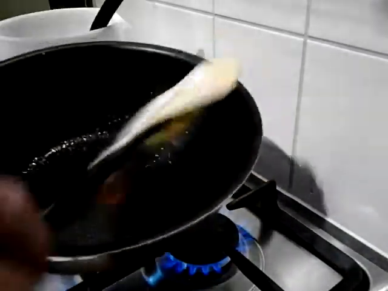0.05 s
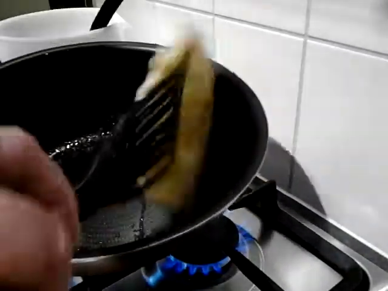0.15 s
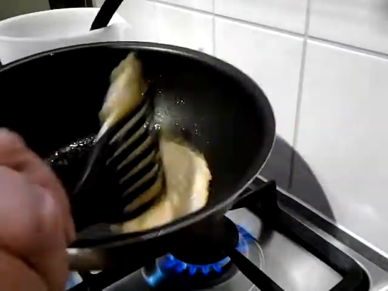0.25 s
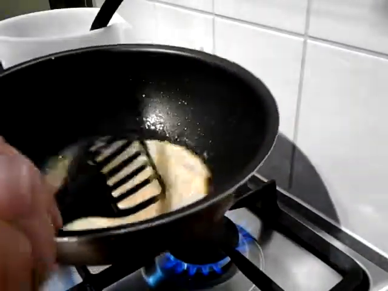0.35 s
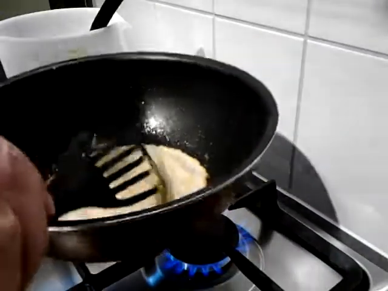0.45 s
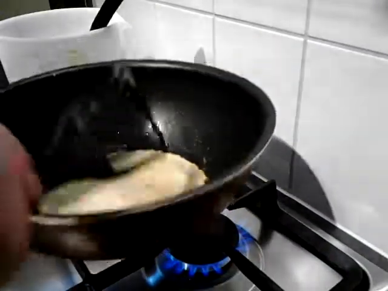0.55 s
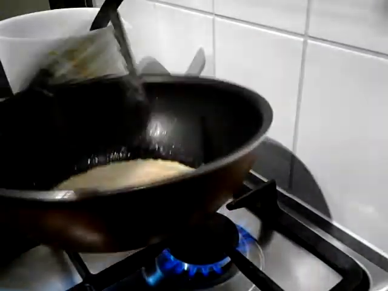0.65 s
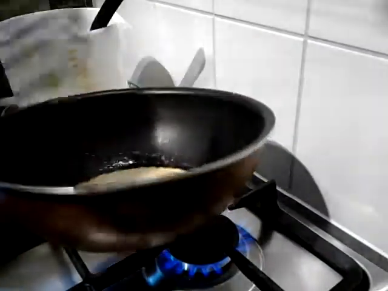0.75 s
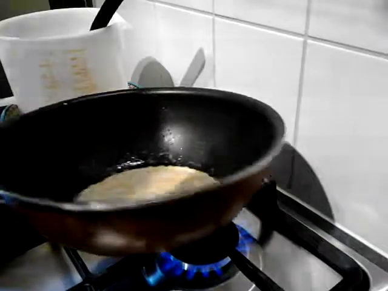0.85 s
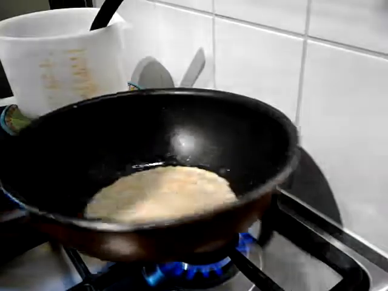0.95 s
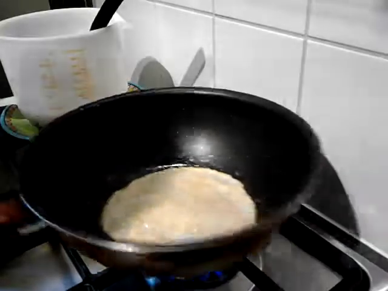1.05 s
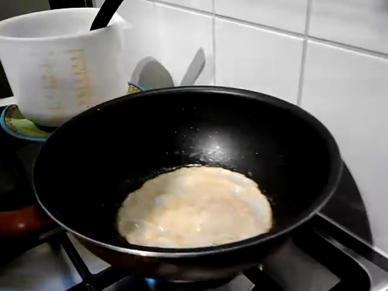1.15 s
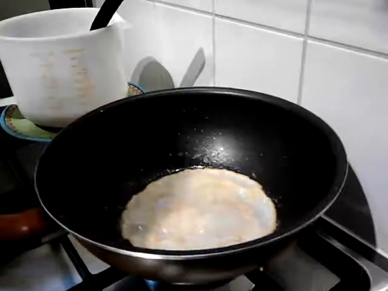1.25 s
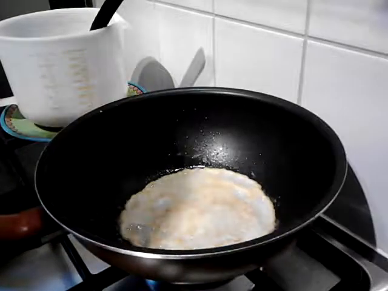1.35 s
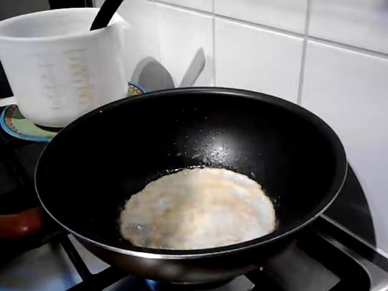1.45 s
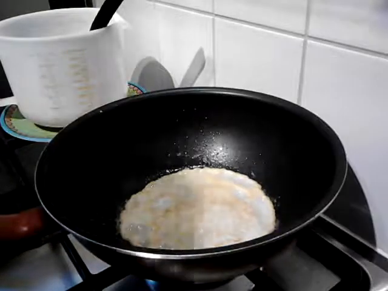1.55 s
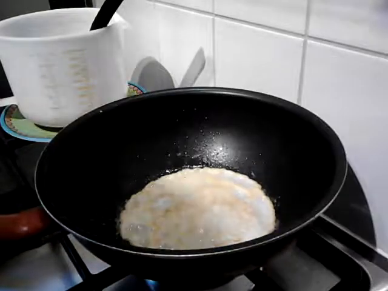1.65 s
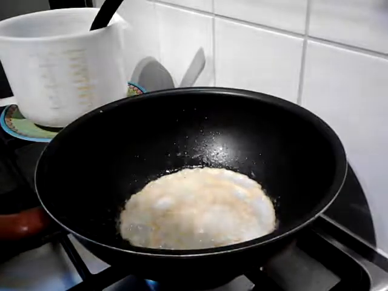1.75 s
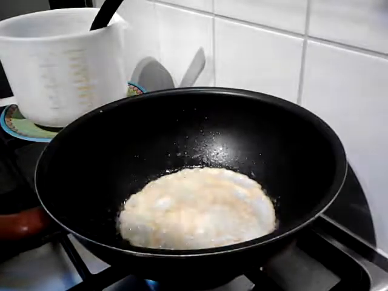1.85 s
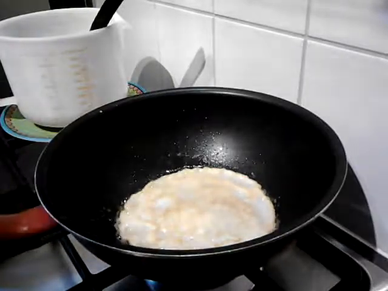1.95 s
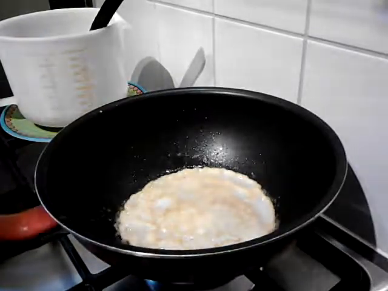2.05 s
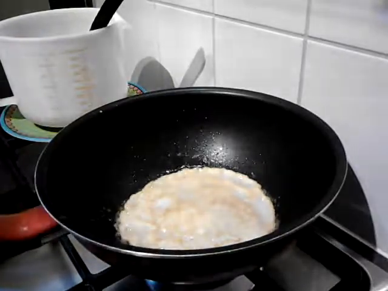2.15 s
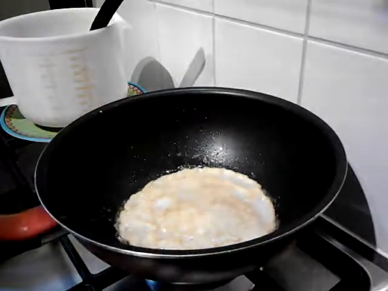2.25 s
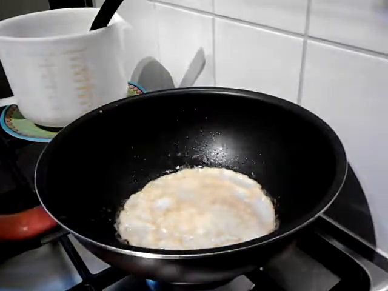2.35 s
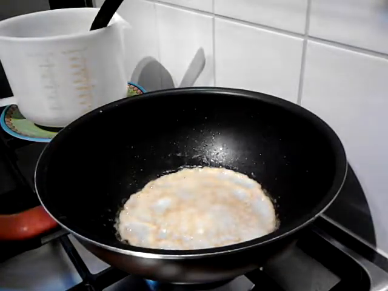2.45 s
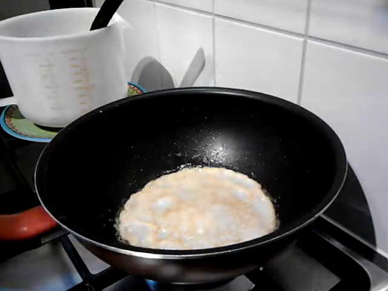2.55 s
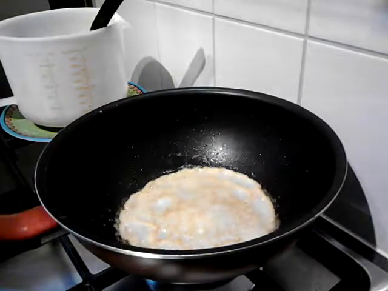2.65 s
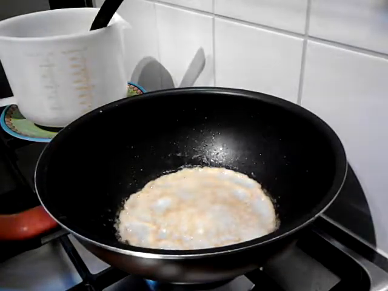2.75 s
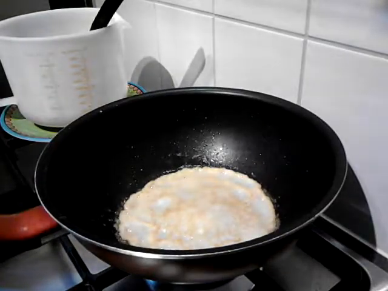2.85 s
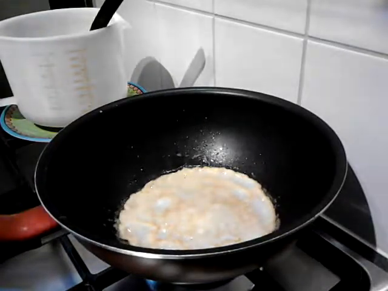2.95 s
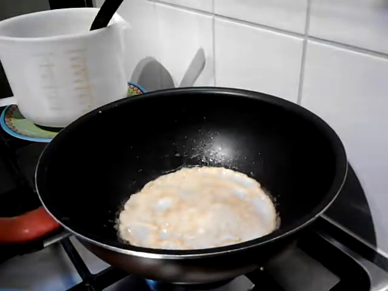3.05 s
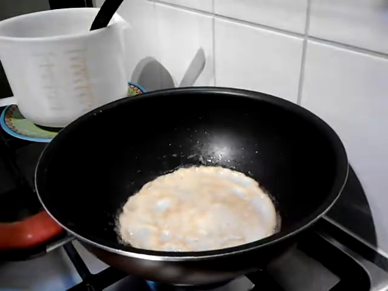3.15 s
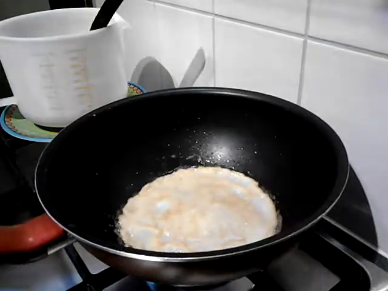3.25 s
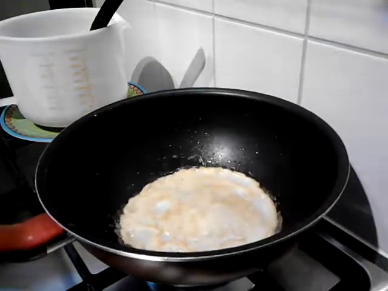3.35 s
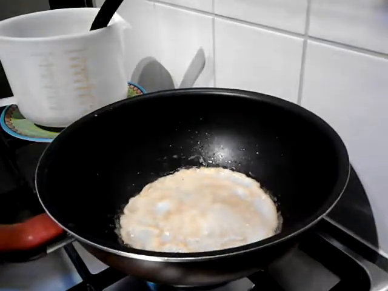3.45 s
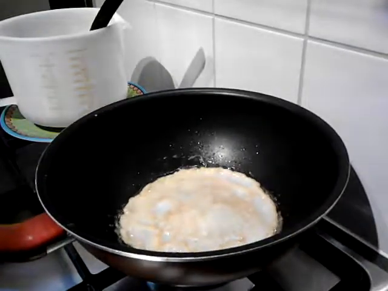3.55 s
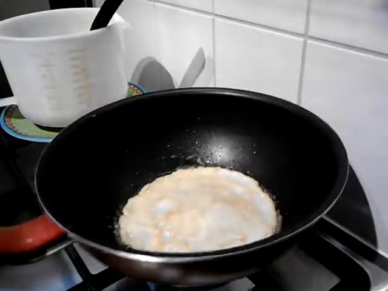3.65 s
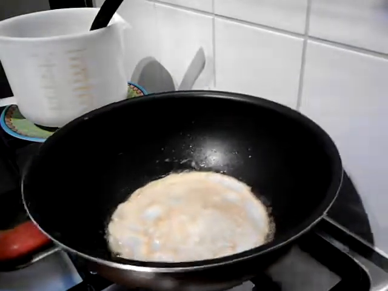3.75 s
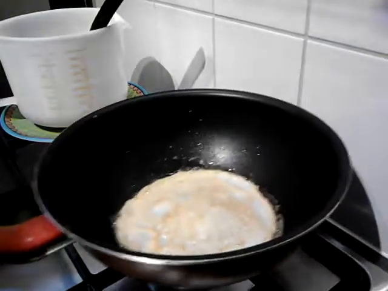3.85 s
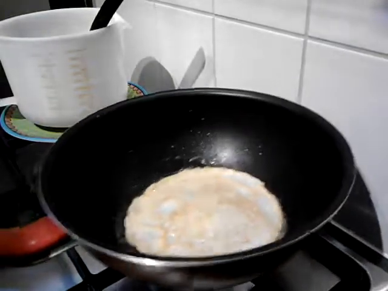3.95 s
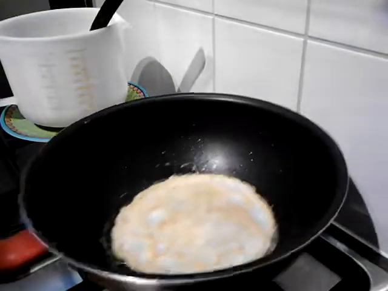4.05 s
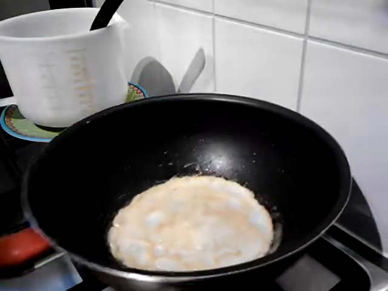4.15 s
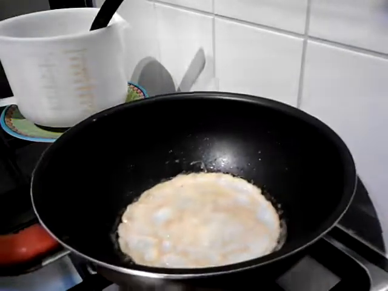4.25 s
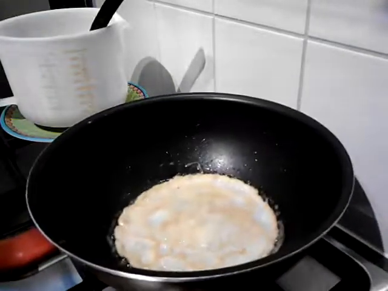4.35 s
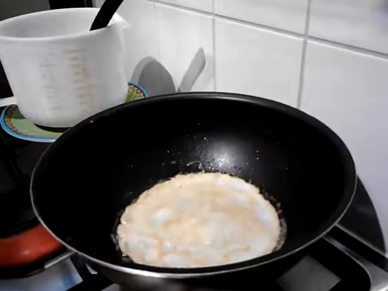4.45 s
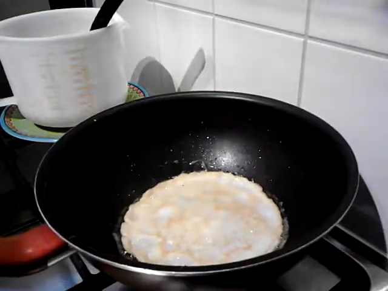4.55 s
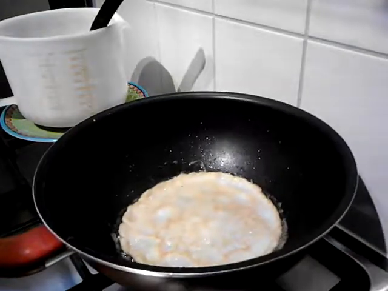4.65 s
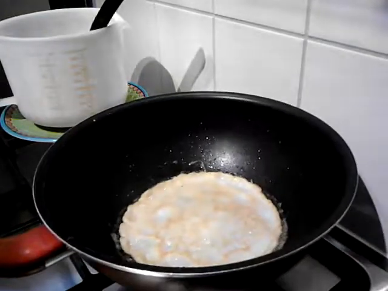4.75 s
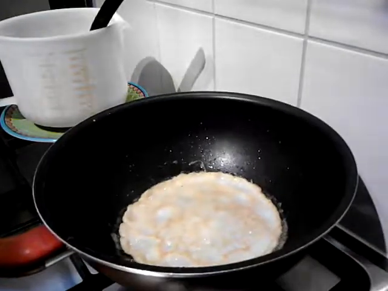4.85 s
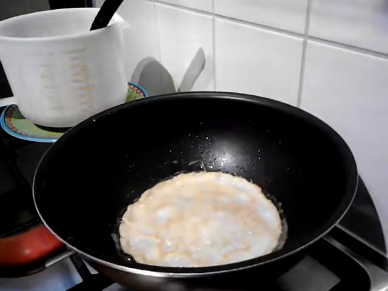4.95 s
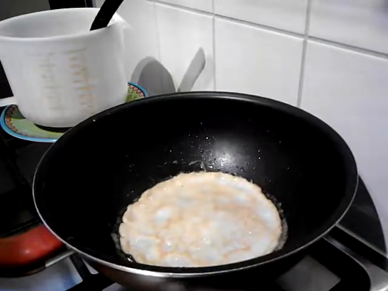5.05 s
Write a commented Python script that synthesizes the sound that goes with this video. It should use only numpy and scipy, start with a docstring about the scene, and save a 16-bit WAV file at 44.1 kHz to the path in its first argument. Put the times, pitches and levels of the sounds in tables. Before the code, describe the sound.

In a small tiled kitchen, a spatula taps a pan rim once, then the frying pan lands hard on the steel grate with a loud metallic clank and rocks in quick, fading clatters. A second later the spatula drops on the worktop and bounces briefly. Much softer pan knocks follow as it is nudged. A low, steady gas hiss and faint sizzle lie beneath. Close microphone, short hard room reflections.

```python
"""A frying pan lands on the steel grate of a lit gas hob in a small tiled kitchen, rocks, and is later nudged.
A spatula taps the pan's rim before the pan lands, and bounces on the worktop between the landing and the nudge.
Each contact is a noisy crack and clatter plus the object's ringing pitches, answered by the room.
Filtered noise makes the steady burner hiss, wavering sines its faint whistles, and tiny clicks the hot fat."""
import sys
import numpy as np
from scipy import signal
from scipy.fft import rfft, irfft, next_fast_len
from scipy.io import wavfile
from scipy.ndimage import map_coordinates

SR = 44100
rng = np.random.default_rng(int(sys.argv[2]) if len(sys.argv) > 2 else 0)


def file_out(sig):
    """Save sig as 16-bit WAV at sys.argv[1]."""
    # one column per channel
    cols = np.atleast_2d(sig).T
    # limit, then scale
    lim = np.clip(cols, -1, 1)
    pcm = np.round(lim * 32767).astype(np.int16)
    wavfile.write(sys.argv[1], SR, pcm)


N = 224940  # length of the scene in samples


def pan():
    """The pan's metal rings as it lands on the grate and rocks, and again when it is nudged."""
    # pan striking the grate, and the hob's sheet metal booming just after the first landing:
    # (time [s], clank level [dB], thud relative to clank [dB],
    # ting relative to clank [dB], pitch the contact point favours [Hz])
    pan_blows = [(.9725, -21.5, -23.5, -26.5, 1420), (.985, -32, -3, -17.5, 915),
                 (1.038, -34, -6.5, -34, 890), (1.108, -24, -7, -2.5, 1760),
                 (1.168, -27.5, -10.5, -12, 1350), (1.178, -33, -3.5, -29, 1455),
                 (1.275, -38.5, -16, -40, 1340), (1.345, -39, -12.5, -25, 1450),
                 (3.348, -49, -24, -30.5, 2040), (3.367, -50, -19, -22, 1105),
                 (3.659, -45.5, -17.5, -42, 1430), (3.7005, -38.5, -21.5, -30, 763),
                 (3.719, -38, -14, -26, 1210), (3.796, -38, -16.5, -20.5, 1330),
                 (3.899, -38, -10.5, -22, 1446), (3.912, -51.5, 0.5, -5, 275)]
    # ringing modes of the pan on its grate, the lowest from the hob's sheet metal, before random scatter:
    # (pitch [Hz], relative level [dB], time to fall 60 dB [s])
    pan_modes = [(99.2, -4.5, 0.42), (174, -12, 0.57), (214.5, -10, 0.43), (283, 0, 0.22), (366, -5, 0.42),
                 (487, -22, 0.29), (569.4, 0.5, 0.2), (612.6, -0.5, 0.27), (735, -8.5, 0.19),
                 (918, -3.5, 0.25), (981, 1.5, 0.23), (1120.4, 1, 0.26), (1289, -4.5, 0.18),
                 (1430, 6.5, 0.03), (1526, -21.5, 0.25), (1579, -3, 0.079), (1734, -8, 0.13),
                 (1855, -16, 0.053), (2170, -7, 0.084), (2174, 0, 0.2), (2337, -4, 0.25), (2890, -19, 0.35),
                 (3430, -7.5, 0.18), (3610, -9.5, 0.22), (4100, -19, 0.081), (5004, -4.5, 0.2),
                 (5420, 3.5, 0.079), (5620, 6, .17), (5870, 5.5, 0.2), (6500, -0.5, 0.12), (7290, -1, 0.11),
                 (7600, -12.5, .11), (8800, -17.5, 0.092)]
    # tone of the dense clatter between the modes: (frequency [Hz], relative level [dB per Hz])
    pan_clatter = [(30, -29.5), (60, -17), (100, -9), (230, 5.5), (430, -8), (620, -5), (1500, -1),
                   (2350, -3.5), (2750, -17.5), (3600, -19.5), (4500, -20.5), (5800, -5.5), (7300, -13),
                   (8300, -34), (15000, -58)]
    contacts = grazed(pan_blows, lead_s=.005, softer_db=17) + chatter()
    contacts = voiced(contacts, knock_db=-3.5, ring_db=-9, ring_follows=.55)
    return blows(contacts, pan_modes, pan_clatter, clatter_db=-3.0, clatter_t60=0.23,
                 crack_db=1.0, crack_t60=0.014, contact_s=0.00049, room_db=-10,
                 blur_hz=23.0, favour_db=13.5)


def chatter(count=2):
    """Soft contacts, each weaker than the last, as the pan comes to rest."""
    # start of each settling: (time [s], first clank level [dB])
    settles = [(1.374, -55.5), (4.03, -60)]
    # (thud relative to clank [dB], ting relative to clank [dB], favoured pitch [Hz])
    chatter_tone = (-5, -12, 1070)
    gap_s, loss_db = 0.018, 3  # from one contact to the next
    contacts = []
    for s, db in settles:
        for k in range(count):
            contacts.append((s + k * gap_s, db - k * loss_db, *chatter_tone))
    return contacts


def spatula():
    """The spatula rings against the pan's rim, then is dropped and bounces on the worktop."""
    # taps on the rim, then bounces on the worktop, both: (time [s], clank level [dB],
    # thud relative to clank [dB], ting relative to clank [dB], pitch the contact point favours [Hz])
    rim_taps = [(.309, -61.5, -7.5, -2.5, 1150), (.399, -32, -31.5, -6.5, 930)]
    worktop_blows = [(2.157, -32, -11, -3.5, 573), (2.187, -37, -29, -15.5, 1580),
                     (2.223, -41, -26, -19, 1336), (2.264, -49.5, -12, -8.5, 2740),
                     (2.319, -50, -6.5, -14.5, 624)]
    # ringing modes of the spatula against the rim, then on the worktop, before random scatter:
    # (pitch [Hz], relative level [dB], time to fall 60 dB [s])
    rim_modes = [(573, -12, 0.29), (910, -5, 0.082), (947, 5.5, 0.086), (1100, 3, 0.028), (1138, -14, 0.35),
                 (1290, -4.5, 0.19), (2505, 5.5, 0.054), (2680, -17, 0.1), (3074, -1, .09),
                 (4725, -3, 0.15), (5830, -4.5, 0.17), (7230, 7.5, 0.06), (9520, -6.5, 0.035)]
    worktop_modes = [(287.5, -12.5, 0.24), (438.6, 7.5, 0.1), (510, 8.5, 0.09), (621.4, 6, 0.28),
                     (688, 8.5, 0.12), (899, -14, 0.65), (1086, -5, 0.27), (1338, -14, 0.62),
                     (1594, 3, 0.063), (1856, -6, 0.4), (2700, -1, 0.26), (3180, -1, 0.27),
                     (3790, 13, 0.057), (4140, 12.5, 0.041), (4385, 17.5, 0.042), (4670, -7, 0.32),
                     (5800, 12, 0.055), (5820, 17, 0.075)]
    # tone of the clatter on rim, then worktop: (frequency [Hz], relative level [dB per Hz])
    rim_clatter = [(40, -37), (300, -22), (600, 3), (950, -10.5), (1350, -4.5), (1750, -19.5), (2500, -1),
                   (3200, -5), (3750, -10.5), (5000, -3.5), (7200, -18.5), (8000, -22), (12000, -33),
                   (15000, -38)]
    worktop_clatter = [(40, -44), (150, -15.5), (300, -5.5), (450, -6), (680, -17), (820, -2.5),
                       (1600, -4.5), (2900, -4.5), (4300, -10), (6100, 6.5), (7200, -21.5), (9000, -30),
                       (15000, -50)]

    taps = grazed(rim_taps, lead_s=.012, softer_db=15.5)
    taps = voiced(taps, knock_db=-19.0, ring_db=-1, ring_follows=0.74)
    bounces = grazed(worktop_blows, lead_s=0.0087, softer_db=13)
    bounces = voiced(bounces, knock_db=-4.5, ring_db=5.5, ring_follows=0.82)
    tap = blows(taps, rim_modes, rim_clatter, clatter_db=-4.5, clatter_t60=0.25,
                crack_db=5.0, crack_t60=0.3, contact_s=0.00031, room_db=-19.5,
                blur_hz=28, favour_db=1.5)
    drop = blows(bounces, worktop_modes, worktop_clatter, clatter_db=-4.0, clatter_t60=0.25,
                 crack_db=-2.5, crack_t60=0.077, contact_s=0.00067, room_db=-16,
                 blur_hz=19.8, favour_db=13.5)
    return tap + drop


def grazed(rows, lead_s, softer_db):
    """A light graze comes just before the hardest blow."""
    graze_hz = 1650  # pitch a light graze favours
    s, db, thud, ting, _ = max(rows, key=lambda row: row[1])
    return [(s - lead_s, db - softer_db, thud, ting, graze_hz)] + rows


def voiced(rows, knock_db, ring_db, ring_follows):
    """Contact points that favour lower modes knock more, up to a limit; the ring follows the ting."""
    db_per_octave, most_db = 8, 7.5  # growth of the knock, and its limit over the clank
    contacts = []
    for s, db, thud, ting, hz in rows:
        knock = min(knock_db - db_per_octave * np.log2(hz / 1000), most_db)
        ring = ring_db + ring_follows * ting
        contacts.append((s, db, thud, knock, ring, ting, hz))
    return contacts


def blows(rows, modes, clatter, clatter_db, clatter_t60, crack_db, crack_t60, contact_s, room_db,
          blur_hz, favour_db):
    """Each contact is a crack, a dense clatter and ringing modes, answered by the tiled room."""
    # how long the room echoes: (frequency [Hz], time to fall 60 dB [s])
    kitchen = [(100, 0.35), (500, 0.52), (1500, 0.25), (4000, 0.3), (8000, 0.1), (15000, 0.13)]
    out, t = np.zeros(N + SR), np.arange(SR) / SR
    hardest_db = max(row[1] for row in rows)
    for s, db, thud, knock, ring, ting, favoured in rows:
        # countless small modes overlap; the higher ones die sooner
        dense = dying_noise(lambda hz: clatter_t60 * (1000 / (hz + 100)) ** 0.24)
        crack = dying_noise(lambda hz: crack_t60 + 0 * hz)
        rattle = coloured(dense + amp(crack_db) * crack, lambda hz: amp(along(clatter, hz)))
        rattle = rattle / np.linalg.norm(rattle)
        hit = ringing(modes, scatter_db=4.8, blur_hz=blur_hz, swell_cycles=1.0) + amp(clatter_db) * rattle
        # gentle contacts take longer to build up
        rise_s = contact_s * amp((hardest_db - db) / 2) ** .5
        hit = hit * (1 - np.exp(-(t / rise_s) ** 2))
        # the modes that move most at the contact point take more of the blow
        hit = coloured(hit, lambda hz: amp(favour_db / (1 + ((hz / favoured - 1) / .1) ** 2)))
        # the room answers 5 ms later
        room = np.pad(dying_noise(lambda hz: along(kitchen, hz)), (SR // 200, 0))
        hit = hit + amp(room_db) * signal.fftconvolve(hit, room)[:SR]
        start = round(s * SR)
        out[start:start + SR] += weighted(hit, db + np.array([thud, knock, 0, ring, ting]))
    return out[:N]


def ringing(modes, scatter_db, blur_hz, swell_cycles):
    """One second of an object's modes, energy 1; loose contact blurs each pitch, low modes swell slowly."""
    t = np.arange(SR, dtype=np.float32) / SR
    hz, db, t60 = np.float32(modes).T[:, :, None]
    strength = np.float32(amp(db + scatter_db * rng.standard_normal(hz.shape)))
    # each pitch jumps at random 180 times a second, higher ones further; blur_hz holds at 1 kHz
    jumps = np.float32(blur_hz * rng.standard_normal((len(hz), 180)))
    drift = np.repeat(jumps, SR // 180, axis=1) * np.sqrt(hz / 1000)
    cycles = hz * t + np.cumsum(drift, axis=1) / SR + np.float32(rng.random(hz.shape))
    decay = np.exp(np.maximum(-float(np.log(1000)) * t / t60, -40))
    swell = 1 - np.exp(-np.minimum(hz * t / swell_cycles, 40))
    ring = np.sum(strength * decay * swell * np.sin(2 * np.pi * cycles), axis=0)
    return ring / np.linalg.norm(ring)


def dying_noise(t60):
    """One second of noise, energy 1, in which each frequency falls 60 dB in t60(Hz) seconds."""
    hz, t, z = signal.stft(rng.standard_normal(SR), SR, nperseg=128)
    fade = amp(-60 * t / t60(hz)[:, None])
    tail = signal.istft(z * fade, SR, nperseg=128)[1][:SR]
    return tail / np.linalg.norm(tail)


def weighted(hit, band_db):
    """The place and hardness of a contact set how strongly each band starts."""
    # borders between thud, knock, clank, ring and ting: (frequency [Hz])
    band_edges = [400, 800, 2600, 5000]
    start = hit[:SR // 30]
    # power per 1 Hz bin, then summed in each band
    power = 2 * np.abs(rfft(start, SR)) ** 2 / (SR * len(start))
    own = np.bincount(np.searchsorted(band_edges, np.arange(len(power))), power)
    lift = np.asarray(band_db) - 10 * np.log10(own)
    # the gain slides from band to band around each border
    corners = np.outer(band_edges, [.92, 1.08]).ravel()
    return coloured(hit, lambda hz: amp(np.interp(hz, corners, np.repeat(lift, 2)[1:-1])))


def whistle(waver_hz, flutter_db):
    """Unsteady tones from the burner's jet swell, hold and sink back into the hiss."""
    # brief whistles near one of two pitches, level before flutter and the mix:
    # (start [s], length [s], middle pitch [Hz], level [dB])
    whistles = [(0.426, 0.14, 4370, -59), (0.772, 0.33, 4280, -62), (1.14, 0.33, 4270, -53.5),
                (1.8, 0.23, 6420, -61.5), (2.291, 0.13, 4300, -54.5), (2.722, 0.19, 6430, -55),
                (2.952, 0.22, 6440, -53.5), (3.393, .08, 4250, -59), (3.439, 0.15, 6390, -53),
                (3.696, 0.11, 6420, -51.5), (3.706, 0.085, 4380, -56), (3.91, 0.27, 4270, -56.5),
                (4.262, .25, 4324, -60.5), (4.737, .18, 4320, -57.5)]
    attack_s, release_s = 0.036, 0.031
    t, out = np.arange(N) / SR, np.zeros(N)
    drift = np.cumsum(waver_hz * wobble(300)) / SR
    for s, length, hz, db in whistles:
        swell = np.clip(np.minimum((t - s) / attack_s, (s + length - t) / release_s), 0, 1)
        out += amp(db) * swell * np.sqrt(2) * np.sin(2 * np.pi * (hz * t + drift))
    return out * amp(flutter_db * wobble(70))


def flame():
    """Gas rushes through the burner's air resonances as filtered noise; its level flutters slightly."""
    # tone of the steady noise: (frequency [Hz], relative level [dB per Hz])
    flame_tone = [(20, -28), (50, -15.5), (75, -2), (95, 7.5), (130, -2), (300, -1.5), (800, -8), (1500, 0),
                  (3000, -7), (5000, -2.5), (6800, -5), (8200, -19), (11000, -30.5), (15400, -35)]
    # air resonances: (centre [Hz], width [Hz], relative level [dB])
    burner = [(622.6, 28, 5), (1772, 69, 10.5), (4263, 190, 8), (6453, 220, 9.5)]

    def gain(hz):
        power = amp(along(flame_tone, hz)) ** 2
        for centre, width, db in burner:
            power = power + amp(db) ** 2 / (1 + (2 * (hz - centre) / width) ** 2)
        return np.sqrt(power)

    hiss = unit(coloured(rng.standard_normal(N), gain))
    level_db = -59.0 + 0.2 * wobble(1.1) + 0.13 * wobble(22.56)
    return amp(level_db) * hiss


def sizzle(spread_db, count=2500):
    """Tiny bursts of hot fat, clicks of many sizes, densest at the start and thinning out."""
    when, size = rng.random((count, 2)).T
    # squaring the random size makes big pops rare
    pops = np.bincount((when ** 1.5 * (N - 1)).astype(int), amp(spread_db * size ** 2), N)
    # (frequency [Hz], relative level [dB])
    tone = [(500, -27.5), (2500, -5), (6500, 6.5), (9000, -10.0), (15000, -20.5)]
    return unit(coloured(pops, lambda hz: amp(along(tone, hz))))


def amp(db):
    """Turns decibels into a gain."""
    return 10 ** (np.asarray(db) / 20)


def unit(x):
    """Scales x to an average (rms) strength of 1."""
    return x / np.sqrt(np.mean(x ** 2) + 1e-20)


def along(points, hz):
    """Reads a curve through (frequency [Hz], value) points on a log frequency axis."""
    f, v = np.transpose(points)
    return np.interp(np.log(hz + 1), np.log(f + 1), v)


def wobble(rate):
    """A smooth random curve through rate random points a second."""
    points = rng.standard_normal(int(N * rate / SR) + 4)
    return map_coordinates(points, [np.arange(N) * rate / SR])


def coloured(x, gain):
    """Filters x with gain(Hz); the filter never answers before its input (minimum phase)."""
    m = 2 * next_fast_len(len(x) // 2 + 4096)
    cepstrum = irfft(np.log(np.maximum(gain(np.fft.rfftfreq(m, 1 / SR)), 1e-6)))
    # folding the second half onto the first removes any response ahead of time
    cepstrum[1:m // 2] *= 2
    cepstrum[m // 2 + 1:] = 0
    return irfft(rfft(x, m) * np.exp(rfft(cepstrum)), m)[:len(x)]


def scene():
    """Pan and spatula knocks over the running burner and its quiet sizzle."""
    jet = amp(-2.5) * whistle(waver_hz=44.36, flutter_db=3.5)
    fat = amp(-70.5) * sizzle(spread_db=18.5)
    return (pan() + spatula() + flame() + jet + fat)[None]


def record(dry):
    """Thins the deepest bass and keeps nothing above the band limit."""
    bass_hz, top_hz = 45, 15550
    thin = signal.sosfilt(signal.butter(1, bass_hz, "highpass", fs=SR, output="sos"), dry)
    m = next_fast_len(N + SR // 2)
    kept = np.fft.rfftfreq(m, 1 / SR) < top_hz
    return irfft(rfft(thin, m) * kept, m)[..., :N]


dry = scene()
out = record(dry)
file_out(out)
```